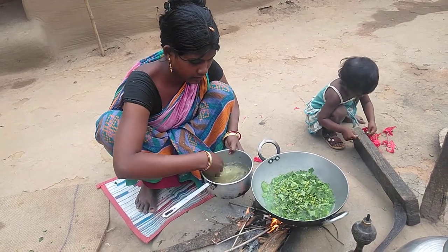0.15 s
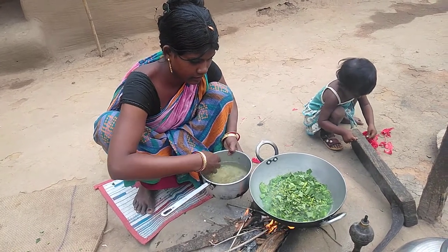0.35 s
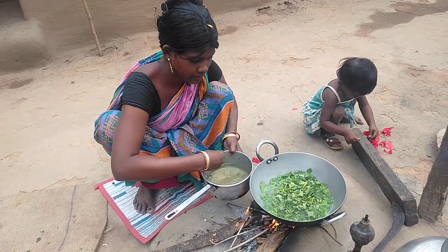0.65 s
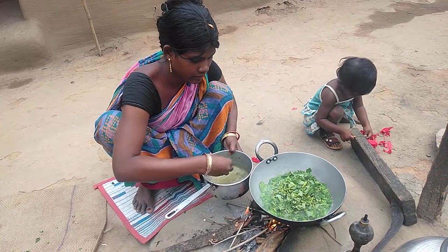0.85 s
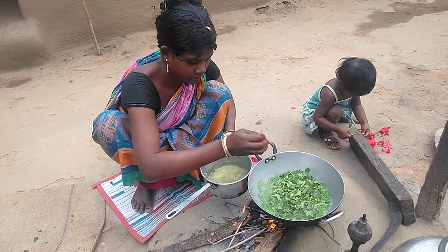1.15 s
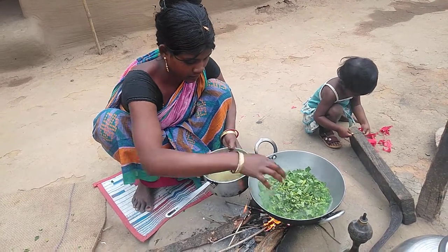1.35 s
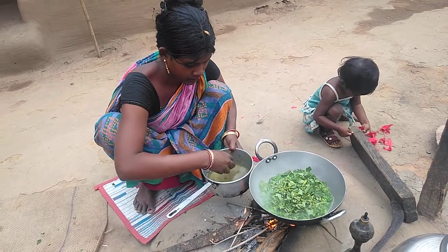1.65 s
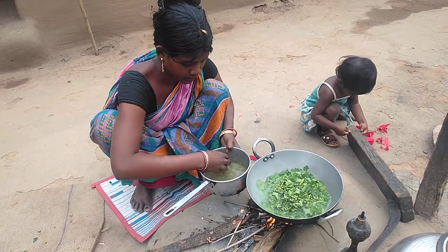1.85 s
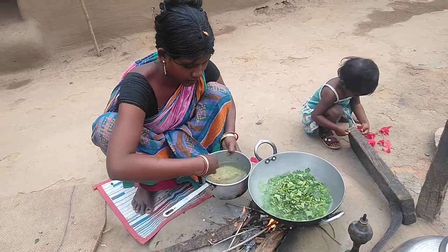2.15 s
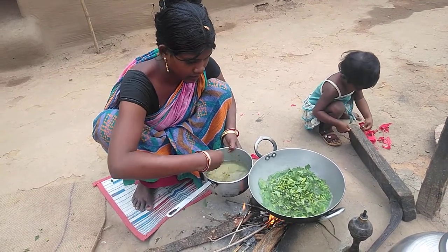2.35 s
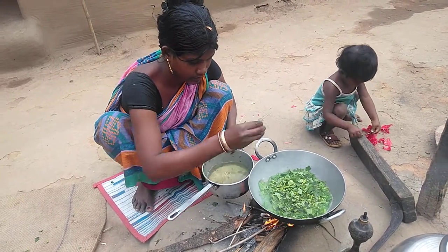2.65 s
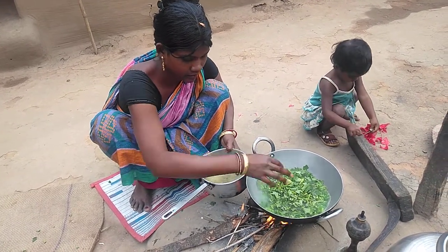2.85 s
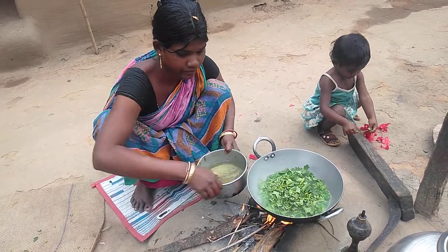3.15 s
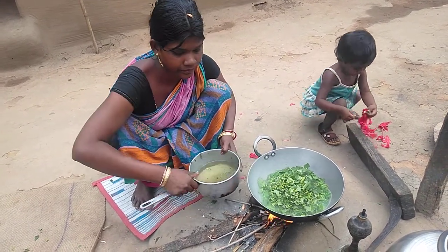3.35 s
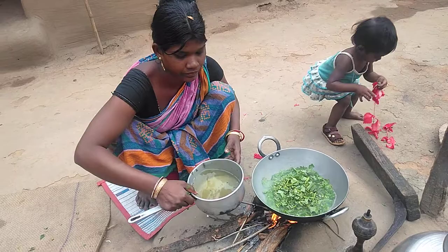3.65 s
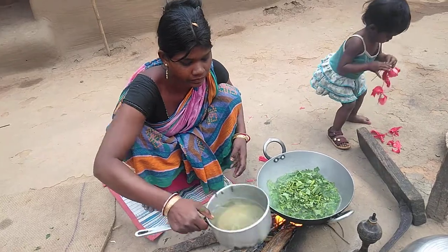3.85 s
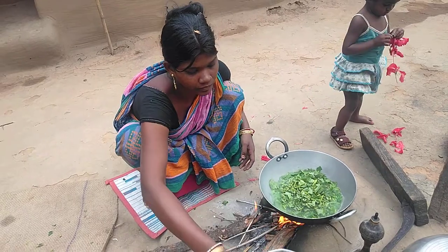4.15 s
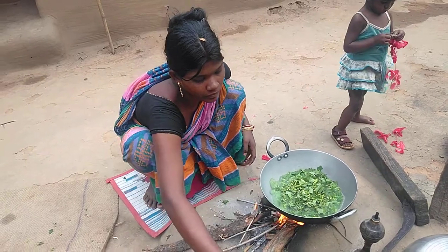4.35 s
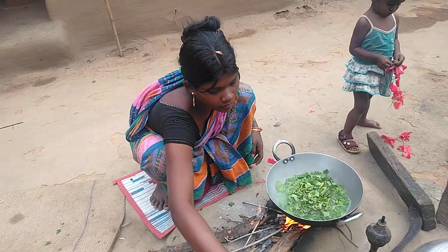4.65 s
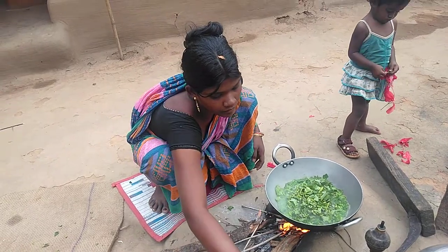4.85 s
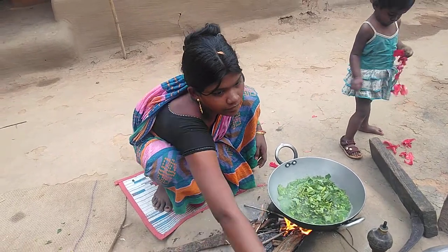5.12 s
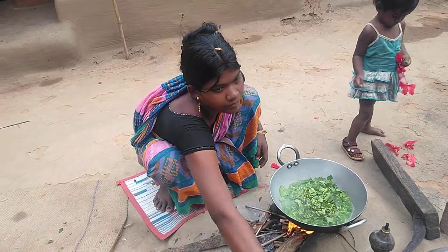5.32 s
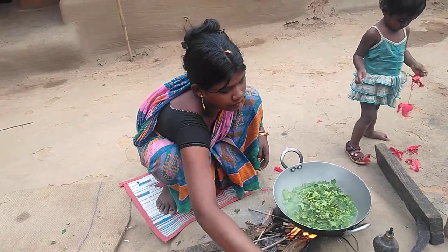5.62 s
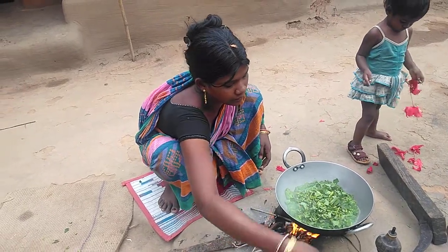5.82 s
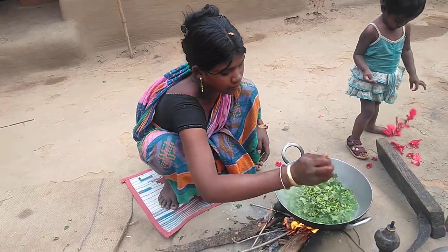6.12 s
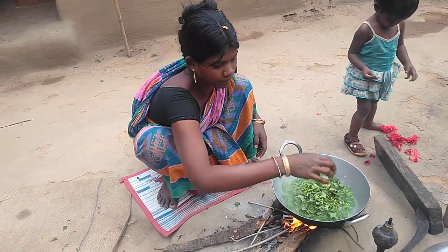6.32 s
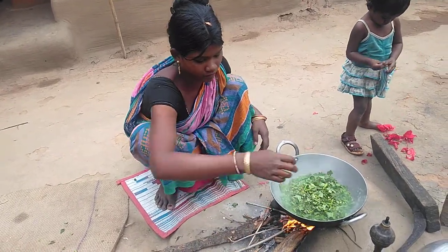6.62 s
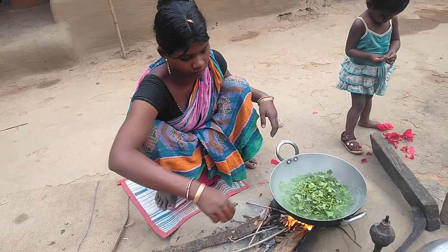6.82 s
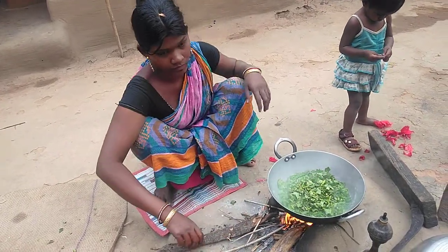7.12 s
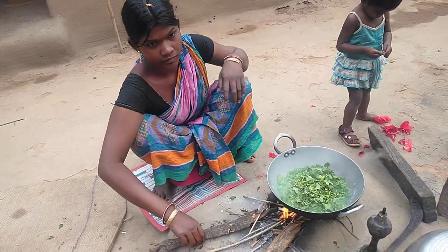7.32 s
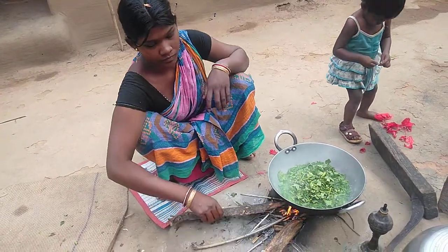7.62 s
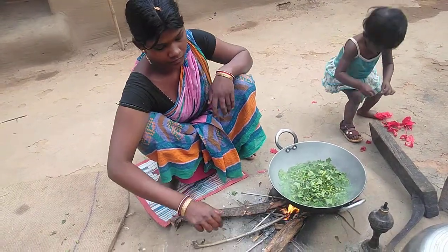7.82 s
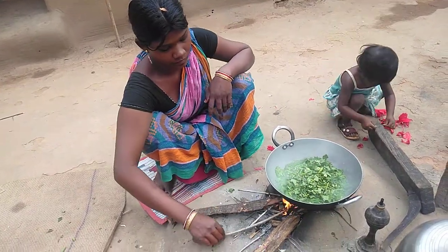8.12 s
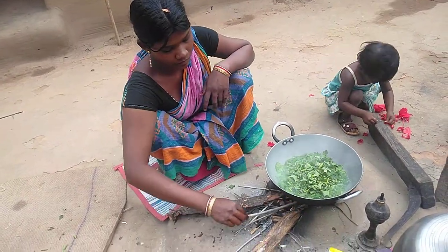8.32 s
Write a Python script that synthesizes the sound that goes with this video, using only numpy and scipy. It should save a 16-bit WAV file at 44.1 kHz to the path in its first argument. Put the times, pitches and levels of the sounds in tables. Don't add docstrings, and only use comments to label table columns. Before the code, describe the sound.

Greens sizzle steadily in a wide pan outdoors; bangles clink, a steel pot is set down with a ring, a ladle clatters, twigs knock.

```python
import sys
import numpy as np
from scipy import signal
from scipy.fft import rfft, irfft, next_fast_len
from scipy.io import wavfile
from scipy.ndimage import uniform_filter1d

SR = 44100
rng = np.random.default_rng(int(sys.argv[2]) if len(sys.argv) > 2 else 0)


def master(y):
    cut = np.clip(np.atleast_2d(y).T, -1, 1)
    pcm = np.round(cut * 32767)
    wavfile.write(sys.argv[1], SR, pcm.astype(np.int16))


def rack_gain(trim_db):
    fader = np.asarray(trim_db, float)
    return 10 ** (fader / 20)


N = 373730

# (frequency [Hz], density [dB per Hz])
SIZZLE_COLOUR = [(300, -67), (520, -20), (750, -16), (1060, -7), (1900, 1.5), (2200, -5.5), (2450, -12.5),
                 (3700, -7), (5700, -6), (6400, -11.5), (8300, -14), (11000, -10.5), (14600, -18),
                 (16000, -27.5)]
# (frequency [Hz], width [Hz], level [dB])
PAN_WALL = [(1103, 100, 8), (1950, 130, -14), (3760, 97, -17), (4340, 89, -16), (4570, 84, -9),
            (5120, 220, -3), (5430, 32, -19)]
# (time [s], level [dB])
HEAT = [(0, -1), (.35, 0), (.65, -4), (1.1, -1), (2.5, -1.5), (3.9, 1), (4.9, 1.5), (5.95, -1.5),
        (7.3, 1.5), (7.95, -1), (8.47, 0.5)]
SIMMER_LEVELS = [-62.5, -70, -63.5, -63]
HEAT_FOLLOW = [0.88, 0.37, 0.33, 0.33]
# (time [s], rise [s], fade [s], level [dB], wetness [dB])
FLARES = [
    (1.48, 0.016, 0.31, -56.5, -8),
    (1.6, 0.28, 0.24, -59.5, -7.5),
    (2.989, 0.13, 0.19, -52, -3),
    (5.5, 0.11, 0.25, -61, -6.5),
    (6.13, 0.098, 0.24, -61, -8),
    (6.37, .17, 0.44, -50.5, -6),
    (6.8, .15, 0.25, -62.5, -8),
    (7.45, 0.086, 0.17, -56.5, -11),
    (8.18, 0.04, 0.12, -61.5, -2),
]
FLARE_LEVELS = [-0.15, 0.45, -1.1, -1.4]
# (frequency [Hz], frequency after the microphone shifts [Hz], width [Hz], level [dB])
GROUND_NOTCHES = [(2750, 3240, 200, -11.5), (6940, 7430, 500, -8)]
MIC_SHIFT = 5.1, 6.4
# (time [s], crack peak [dB], crack frequency [Hz], ring level [dB],
# the blow's own ring [Hz])
SET_DOWN = [
    (4.4443, -33.5, 4350, -22.5, 1810),
    (4.6024, -30.5, 4830, -33, 1240),
    (4.6533, -18, 4080, -49, 1370),
    (4.7042, -19.5, 4830, -33, 1460),
    (4.7441, -28.5, 3760, -35.5, 1450),
]
STIR = [
    (5.017, -26, 5700, -33, 1650),
    (5.025, -25, 5630, -29, 1680),
    (5.0471, -17, 5980, -27.5, 1370),
    (5.0567, -17.5, 5100, -27.5, 2030),
    (5.1108, -24, 5430, -32.5, 1490),
    (5.147, -19, 4430, -25, 1206),
    (5.1615, -42, 4300, -34, 1560),
    (5.1794, -16.5, 5110, -27, 1266),
]
LADLE_DROP = [
    (5.448, -18, 5800, -18, 1660),
    (5.4612, -24, 6100, -21, 1686),
    (5.4768, -29, 3900, -18.5, 1255),
    (5.4934, -19, 5900, -19, 1310),
]
LADLE_RATTLE = [(5.2347, -27.5, 5600, -49, 1460), (5.2387, -19, 4720, -39.5, 864),
                (5.258, -20.5, 5430, -40, 1150), (5.2662, -32, 5130, -40, 1746),
                (5.309, -43, 4940, -37, 1590), (5.3298, -34, 5530, -51, 1490),
                (5.3624, -20, 5120, -25.5, 1500), (5.3845, -20.5, 3590, -34, 1540),
                (5.4164, -26.5, 5530, -24.5, 1527), (5.5767, -33.5, 4830, -41, 1013),
                (5.5882, -40, 4770, -46, 1054), (5.6386, -30.5, 5550, -55, 1050),
                (5.6974, -44, 5240, -43.5, 1950), (5.7555, -30, 4240, -48, 2280),
                (5.7646, -28.5, 4750, -34.5, 1930), (5.8845, -40, 4500, -52, 2360)]
TWIGS = [
    (6.145, -46.5, 4760, -51.5, 1520),
    (6.1748, -42, 4730, -46, 1790),
    (6.1926, -32, 4500, -45, 2060),
    (6.2074, -36.5, 5840, -46.5, 1460),
    (6.249, -30.5, 4700, -46.5, 1370),
    (7.4744, -42.5, 5560, -49, 1910),
    (7.5867, -33, 5100, -39, 2030),
    (7.6191, -38, 4750, -44.5, 1990),
    (7.7082, -40, 4960, -48.5, 2070),
]
# (frequency [Hz], level [dB], t60 [s])
POT_ON_GROUND = [(678, -9, 0.32), (1037, 6.5, 0.042), (1370, -6, .2), (1626, -30, 0.23), (1850, -7, 0.14),
                 (2193, -12.5, 0.39)]
POT_STIRRED = [(1060, -4, 0.12), (2030, -2, 0.07), (2950, -4, 0.076), (3940, -24, 0.17), (4600, -11, 0.13),
               (5430, -4, 0.11), (5870, -8, 0.11)]
POT_FREE = [(893, -26, 0.11), (1200, -5, 0.069), (1650, -4, 0.062), (2200, -5, 0.08), (3900, -7, 0.17),
            (5760, -15, .1)]
DULL = [(1100, -16, 0.12), (1500, -0.5, 0.038), (1990, 3, 0.022)]
# (struck [s], damped [s], frequency [Hz], level [dB], t60 [s])
CLEAR_TONES = [(4.449, 4.62, 725, -44.5, 0.67), (4.449, 4.7, 1245, -45, 1.3), (4.8, 4.53, 1900, -49, 0.34),
               (4.447, 3.9, 2290, -51, .4), (4.449, 4.6, 790, -47.5, .9), (4.445, 4.6, 1400, -45.5, 0.55),
               (4.704, 4.86, 1465, -35, 0.41), (5.025, 5.136, 1200, -37.5, 1.9),
               (5.02, 5.198, 1520, -33, 2.5), (5.7, 4.6, 1400, -36.5, .5), (5.043, 5.13, 1500, -30, 0.81),
               (5.19, 5.8, 3460, -33.5, 0.06), (5.496, 5.704, 1044, -28, 0.3),
               (5.475, 5.625, 1331, -21, 0.25), (5.493, 5.626, 2770, -31, 0.11),
               (5.499, 5.65, 254, -56, 0.46), (6.1, 4.8, 1590, -15, 0.09), (1.253, 1.31, 3550, -62, .4),
               (1.325, 1.375, 3550, -59, .3)]
# (hardest time [s], rise [s], fall [s], level [dB], wall resonance [Hz])
RUBS = [
    (4.444, 0.0036, 0.12, -30, 1240),
    (5.17, 0.17, 0.097, -30.5, 1440),
    (5.256, .03, 0.13, -33.5, 1240),
]
SCRAPES = [
    (4.722, 0.21, 0.28, -35, 1460),
    (5.022, .012, 0.24, -29.5, 1480),
    (5.448, .11, .006, -23.5, 1580),
    (5.452, 0.0058, 0.094, -16, 1540),
]
# (time [s], length [s], start [Hz], end [Hz], level [dB])
GLIDES = [
    (5.243, 0.043, 740, 1900, -45),
    (3.892, .042, 620, 450, -53),
    (5.264, .033, 5300, 2900, -43),
]
# (time [s], peak [dB], loudest frequency [Hz], t60 [s])
BANGLE_CLINKS = [(1.238, -43, 8000, 0.088), (1.3264, -41, 5200, 0.044), (1.3385, -33, 5340, 0.043),
                 (1.396, -33, 4550, 0.037), (1.405, -34, 7900, 0.03), (1.411, -33, 9630, 0.065),
                 (1.425, -33.5, 4830, 0.044), (1.4415, -40, 5160, 0.027), (1.444, -34, 5400, 0.057),
                 (2.8145, -41.5, 5040, 0.019), (2.897, -39, 11950, 0.06), (2.9194, -55, 5420, 0.03),
                 (2.9485, -39, 5430, 0.051)]
# (frequency [Hz], level [dB])
BANGLE_MODES = [(3550, 0.5), (4830, -17), (5351, 3), (7402, 7), (7881, -4), (9491, 5.5), (11650, 0.5),
                (12900, -56), (14640, -27)]
# (time [s], peak [dB], frequency [Hz], t60 [s])
THUDS = [(0.295, -58.5, 247, 0.081), (0.339, -68, 318, 0.12), (0.389, -65, 151, 0.05),
         (2.07, -61, 598, 0.25), (2.427, -60.5, 598, 0.23), (3.93, -59.5, 500, 0.2),
         (4.441, -34.5, 250, 0.051), (4.469, -44.5, 233, 0.17), (4.606, -44, 239, 0.12),
         (4.646, -43, 228, 0.092), (4.701, -43, 203, 0.2), (4.759, -53.5, 178, 0.27),
         (4.897, -55.5, 203, 0.075), (5.092, -51, 570, 0.12), (5.239, -47.5, 260, 0.14),
         (5.491, -48.5, 533, 0.26), (6.58, -52.5, 169, 0.14), (7.512, -57, 266, 0.17),
         (7.588, -52, 555, 0.26), (7.705, -42, 296, 0.089)]
# (time [s], peak [dB], frequency [Hz], t60 [s])
SPITS = [(.15, -46, 1950, 0.05), (.805, -52, 1200, 0.56), (1.485, -47, 1100, 0.1),
         (2.385, -51.5, 2340, 0.2), (2.91, -52.5, 1040, 0.18), (3.47, -54, 2480, 0.1),
         (3.71, -58.5, 770, 2), (8.195, -47, 4630, 0.31), (8.44, -45.5, 4700, 0.054), (.27, -65, 121, 0.37),
         (5.06, -56.5, 205, 0.38), (4.875, -50.5, 820, 0.43), (7.5, -66.5, 151, 0.13)]
# (frequency [Hz], level [dB])
NOISE_THRESHOLD = [(500, -100), (900, -87.5), (1400, -83.5), (2100, -92.5), (2350, -100), (2650, -92),
                   (3400, -82.5), (4400, -80), (5000, -124), (5900, -93), (6450, -88), (7900, -86.5)]
# (frequency [Hz], level [dB])
HISS = [(15, -48), (25, -2.5), (65, -3.5), (388, -19.5), (756, -6.5), (867, -24), (1200, -21), (1500, 2),
        (2000, -28), (3300, -21), (4500, -26), (5400, -70)]
# (frequency [Hz], level [dB])
WHINE = [(12000, -91.5), (13000, -81), (13797, -86.5), (14001, -68.5)]


def evened(x):
    return x / np.sqrt(np.mean(x ** 2) + 1e-20)


def peaked(x):
    return x / np.max(abs(x))


def read(points, hz):
    f, value = np.transpose(points)
    return np.interp(np.log(hz + 1), np.log(f + 1), value)


def add(mix, s, sound):
    part = mix[round(s * SR):][:len(sound)]
    part += sound[:len(part)]


def band(x, lo_hz, hi_hz):
    return signal.sosfilt(signal.butter(4, [lo_hz, hi_hz], "bandpass", fs=SR, output="sos"), x)


def coloured(x, points):
    size = next_fast_len(len(x) + 4096)
    gain = rack_gain(read(points, np.fft.rfftfreq(size, 1 / SR)))
    return irfft(rfft(x, size) * gain, size)[:len(x)]


def resonate(x, hz, width_hz):
    turn = np.exp(2j * np.pi * np.cumsum(hz) / SR)
    r = np.exp(-np.pi * width_hz / SR)
    return 2 * (turn * signal.lfilter([1 - r], [1, -r], x / turn)).real


def ring(hz, t60, size):
    t = np.arange(size) / SR
    fade = np.cos(np.pi / 2 * t / t[-1])
    return rack_gain(-60 * t / max(t60, 1e-3)) * np.sin(2 * np.pi * hz * t) * fade


def body(modes, size, spread_db):
    return sum(rack_gain(db + spread_db * rng.standard_normal()) * ring(hz, t60, size) for hz, db, t60 in modes)


def sizzle():
    bursts = rack_gain(2.8 * np.minimum(rng.exponential(1, N), 5))
    bursts *= rng.random(N) < 2500 / SR
    bursts = signal.oaconvolve(bursts, np.hanning(24))[:N] * rng.standard_normal(N)
    raw = coloured(0.5 * evened(bursts) + rng.standard_normal(N), SIZZLE_COLOUR)
    raw += 0.6 * sum(resonate(raw, f + np.zeros(N), width_hz=w) * rack_gain(0.11 * db) for f, w, db in PAN_WALL)

    hz, t, z = signal.stft(raw, SR, nperseg=1024, noverlap=768)
    chance = rng.standard_normal((2,) + z.shape)
    streaks = evened(uniform_filter1d(uniform_filter1d(chance[0], size=2, axis=0), size=9, axis=1))
    patches = evened(uniform_filter1d(uniform_filter1d(chance[1], size=9, axis=0), size=12, axis=1))

    edges_hz = [(1400, 2500), (600, 1400), (2600, 7000), (8000, 13500)]
    lift_db = [db - 20 * np.log10(band(raw, *e).std()) for db, e in zip(activity(t), edges_hz)]
    centres_hz = [1150, 1600, 2350, 2900, 6600, 8200]
    field_db = np.array([np.interp(hz, centres_hz, [gurgle, main, main, spit, spit, fizz])
                         for main, gurgle, spit, fizz in zip(*lift_db)]).T
    field_db += np.interp(hz, [1000, 6000, 8000], [3.5, 4.5, 0.5])[:, None] * streaks
    field_db += np.interp(hz, [1000, 4000, 9000], [1.5, 1.0, 0.8])[:, None] * patches
    for before_hz, after_hz, width_hz, db in GROUND_NOTCHES:
        notch_hz = np.interp(t, MIC_SHIFT, [before_hz, after_hz])
        field_db += db * np.exp(-((hz[:, None] - notch_hz) / width_hz) ** 2)
    return signal.istft(z * rack_gain(field_db), SR, nperseg=1024, noverlap=768)[1][:N]


def activity(t):
    heat_db = np.interp(t, *np.transpose(HEAT))
    power = rack_gain(np.c_[SIMMER_LEVELS] + np.c_[HEAT_FOLLOW] * heat_db) ** 2
    for s, rise, fade, db, wet_db in FLARES:
        swell = np.sin(np.pi / 2 * np.clip((t - s) / rise, 0, 1))
        swell *= np.exp(-(np.maximum(t - s - rise, 0) / fade) ** 1.53)
        flare_db = db + np.c_[FLARE_LEVELS] + wet_db * np.c_[[0, 1, 0, 0]]
        power = power + (rack_gain(flare_db) * swell) ** 2
    return 10 * np.log10(power)


def blows(rows, modes, t60, ring_db, own_db, own_t60):
    out, t = np.zeros(N), np.arange(SR // 4) / SR
    for s, crack_db, crack_hz, low_db, low_hz in rows:
        puff = rng.standard_normal(len(t)) * (rack_gain(-60 * t / max(t60, 0.005)) + 0.8 * np.exp(-t / 0.0015))
        crack = peaked(coloured(band(puff, 3280, 13800), SIZZLE_COLOUR))
        spot = peaked(resonate(puff, crack_hz + 0 * t, width_hz=290))
        knock = peaked(band(puff, 624, 3440))
        ringing = body(modes, len(t), spread_db=2.0) + rack_gain(own_db) * ring(low_hz, own_t60, len(t))
        ringing = peaked(band(ringing, 653, 11000))
        bright = rack_gain(crack_db) * (0.56 * crack + 0.63 * spot)
        add(out, s, bright + rack_gain(low_db + ring_db) * (ringing + 0.5 * knock))
    return out


def tones():
    out, t = np.zeros(N), np.arange(SR // 2) / SR
    for s, damped_s, hz, db, t60 in CLEAR_TONES:
        touch = rack_gain(-60 * np.maximum(t - (damped_s - s), 0) / 0.052) * (1 - np.exp(-t / 0.0011))
        add(out, s, rack_gain(db) * touch * ring(hz, t60, len(t)))
    return out


def drag(rows, grit_db):
    ends_db, sag = -28.5, 0.22
    out = np.zeros(N)
    for s, rise, fall, db, wall_hz in rows:
        t = np.arange(-rise, fall, 1 / SR)
        slack = np.maximum(-t / rise, t / fall)
        slips = rack_gain(2.5 * np.minimum(rng.exponential(1, SR // 2), 4))
        slips *= rng.random(SR // 2) < 1500 / SR
        grain = rng.standard_normal(300) * np.exp(-np.arange(300) / 70)
        grit = signal.oaconvolve(slips, grain)[:SR // 2]
        grit = (grit * np.sign(rng.standard_normal(SR // 2)))[300:len(t) + 300]

        wall = evened(resonate(grit, wall_hz * (1 - sag * slack), width_hz=310))
        wall += 0.67 * evened(band(grit, 520, 2480))
        small_modes = [(f, 0, 0.035) for f in rng.uniform(2770, 9120, 24)]
        tinny = signal.oaconvolve(grit, body(small_modes, size=3000, spread_db=5.5))[:len(t)]
        scratch = 0.97 * evened(coloured(tinny, SIZZLE_COLOUR))
        scratch += evened(band(coloured(grit, SIZZLE_COLOUR), 2330, 21000))
        both = evened(band(wall, 606, 3600)) + rack_gain(grit_db) * evened(scratch)
        pressure = rack_gain(db - 9.5 + ends_db * slack)
        add(out, s - rise, pressure * both * signal.windows.tukey(len(t), 0.03))
    return out


def glides():
    out = np.zeros(N)
    for s, length, start_hz, end_hz, db in GLIDES:
        hz = np.geomspace(start_hz, end_hz, round(length * SR))
        note = resonate(rng.standard_normal(len(hz)), hz, width_hz=0.1 * hz.mean())
        note = resonate(note, hz, width_hz=0.15 * hz.mean())
        add(out, s, rack_gain(db) * evened(note) * signal.windows.tukey(len(hz), 0.5))
    return out


def bangles():
    out, t = np.zeros(N), np.arange(6000) / SR
    for s, db, hz, t60 in BANGLE_CLINKS:
        rattle = rng.standard_normal(len(t)) * np.exp(-t / 0.004) * (rng.random(len(t)) < 0.3)
        modes = body([(f, d, t60) for f, d in BANGLE_MODES], size=len(t), spread_db=3.0)
        chime = signal.oaconvolve(rattle, modes + 4.1 * ring(hz, t60, len(t)))[:len(t)]
        chime *= np.exp(-(t / (0.26 * t60)) ** 3)
        tick = band(rng.standard_normal(len(t)) * np.exp(-t / 0.0032), 3700, 14200)
        add(out, s, rack_gain(db) * peaked(band(peaked(chime) + 0.78 * peaked(tick), 1730, 18000)))
    return out


def lumps(rows, width):
    out, t = np.zeros(N), np.arange(SR // 2) / SR
    for s, db, hz, t60 in rows:
        push = rng.standard_normal(len(t)) * (1 - np.exp(-t / 0.0043)) * rack_gain(-60 * t / max(t60, 0.01))
        lump = resonate(push, hz + 0 * t, width_hz=width * hz)
        add(out, s, rack_gain(db) * peaked(band(lump + 0.023 * push, 0.33 * hz, 1.82 * hz)))
    return out


def yard(x):
    t = np.arange(SR // 4) / SR
    echoes = rng.standard_normal(len(t)) * (rng.random(len(t)) < 0.05)
    tail = echoes * rack_gain(-60 * t / 0.19) * (t > 0.004)
    return x + rack_gain(-11.5) * signal.oaconvolve(x, tail / np.linalg.norm(tail))[:N]


def scene():
    pan = sizzle()
    steel = blows(SET_DOWN, POT_ON_GROUND, t60=0.094, ring_db=-7.0, own_db=-7, own_t60=0.17)
    steel += blows(STIR, POT_STIRRED, t60=0.072, ring_db=2.9, own_db=10.0, own_t60=0.059)
    steel += blows(LADLE_DROP, POT_FREE, t60=0.055, ring_db=-1.4, own_db=12, own_t60=0.065)
    steel += blows(LADLE_RATTLE, DULL, t60=0.045, ring_db=0.5, own_db=18, own_t60=0.063)
    wood = blows(TWIGS, DULL, t60=0.14, ring_db=6.5, own_db=-7.0, own_t60=0.15)
    ladle = drag(RUBS, grit_db=-8) + drag(SCRAPES, grit_db=-2.0) + glides()
    soft = lumps(THUDS, width=0.26) + lumps(SPITS, width=0.12)
    return (yard(steel + wood + ladle + bangles() + soft) + tones() + pan)[None]


def suppressed(x):
    hz, t, z = signal.stft(x, SR, nperseg=512, noverlap=384)
    power = signal.lfilter([0.12], [1, -0.88], abs(z) ** 2, axis=2)
    power = np.maximum(power, 0.27 * abs(z) ** 2)
    threshold = rack_gain(read(NOISE_THRESHOLD, hz)) * (hz < 8000)
    least = rack_gain(np.interp(hz, [5500, 6300], [-22, -40]))[:, None]
    keep = np.maximum(1 - threshold[:, None] ** 2 / (power + 1e-20), 0) ** 2.43
    return signal.istft(z * np.maximum(keep, least), SR, nperseg=512, noverlap=384)[1][:, :N]


def self_noise():
    hiss = rack_gain(-74) * evened(coloured(rng.standard_normal(N), HISS))
    t = np.arange(N) / SR
    return hiss + sum(rack_gain(db) * np.sqrt(2) * np.sin(2 * np.pi * f * t) for f, db in WHINE)


def band_limit(x):
    return signal.sosfilt(signal.butter(12, 16620, fs=SR, output="sos"), x)


def record(dry):
    edge = signal.firwin(511, 16200, window=("kaiser", 9), fs=SR)
    mix = signal.oaconvolve(suppressed(dry) + self_noise(), edge[None], "same")
    return band_limit(mix)


dry = scene()
out = record(dry)
master(out)
```